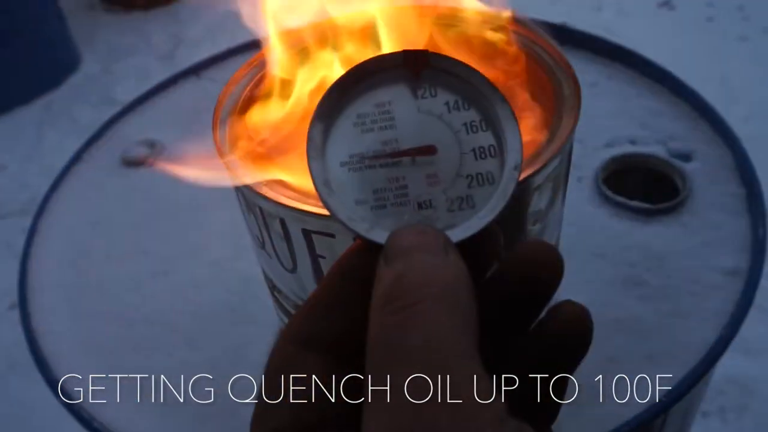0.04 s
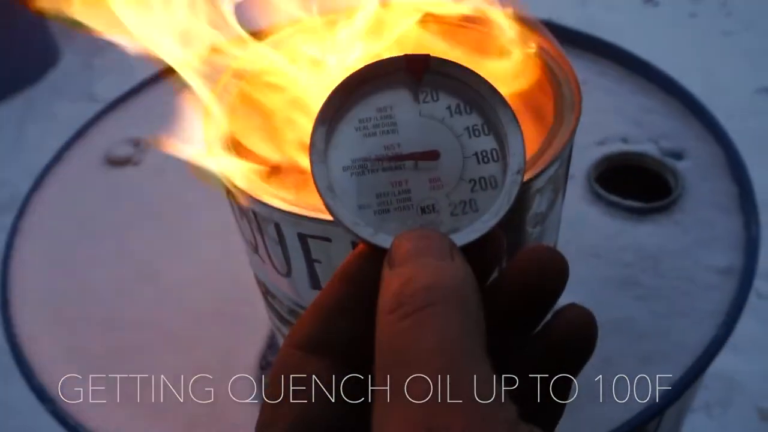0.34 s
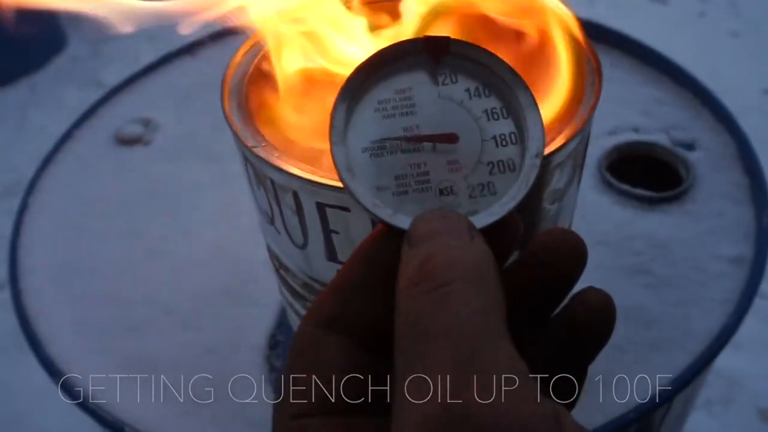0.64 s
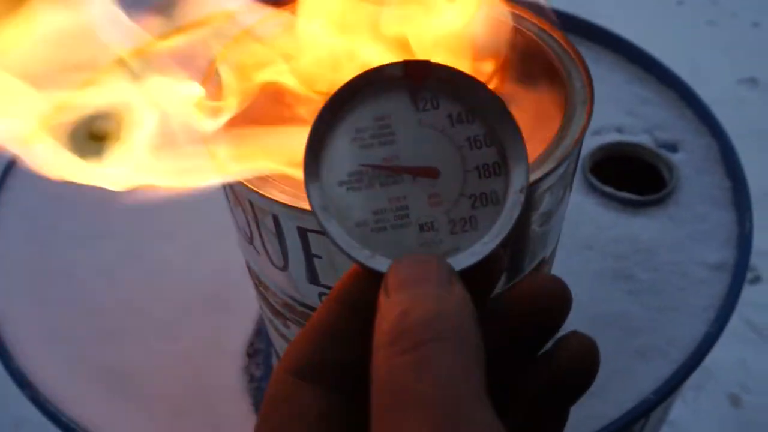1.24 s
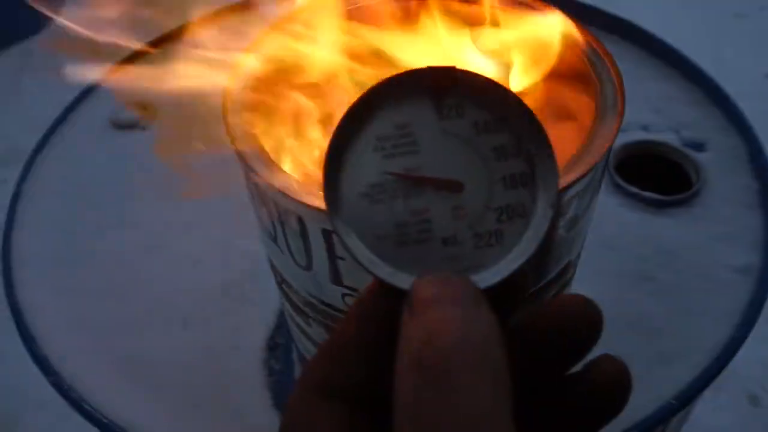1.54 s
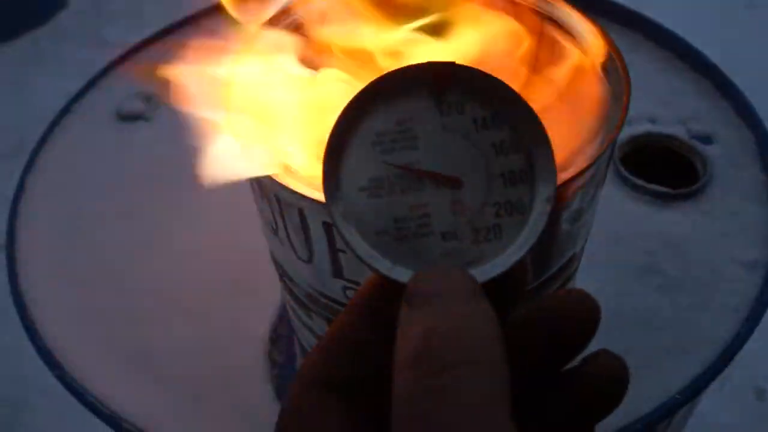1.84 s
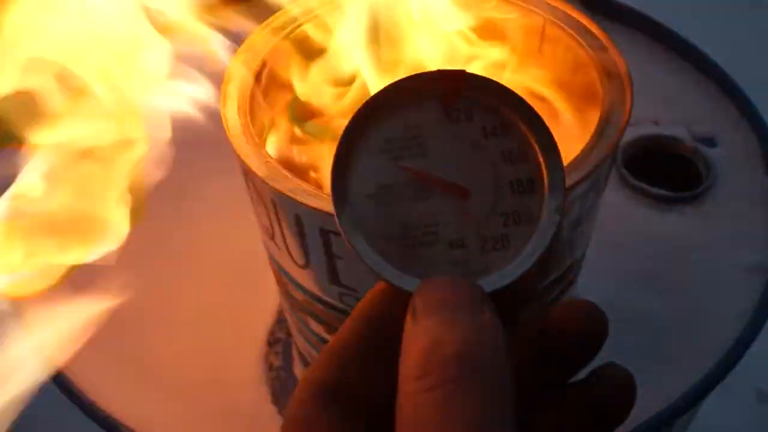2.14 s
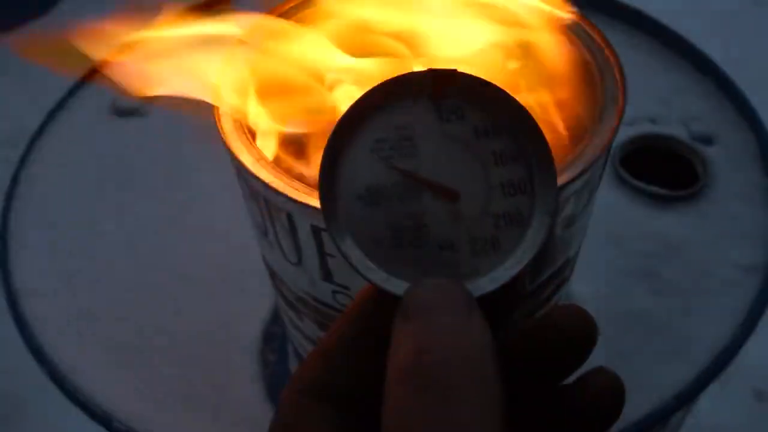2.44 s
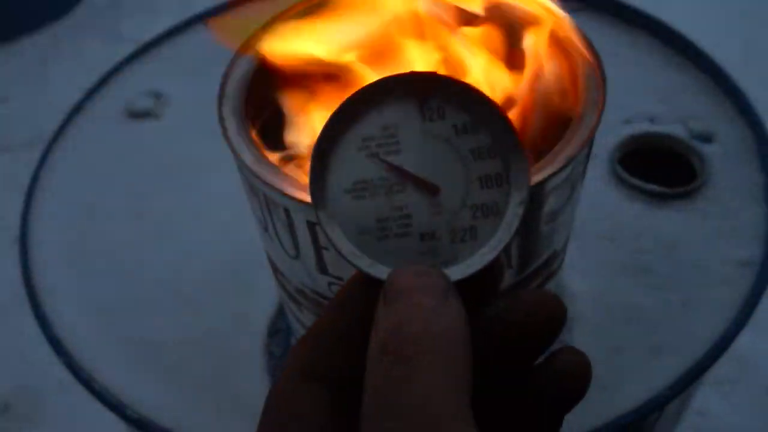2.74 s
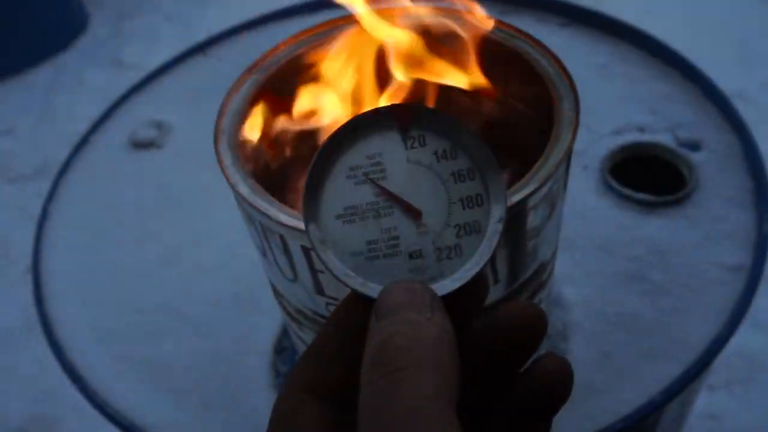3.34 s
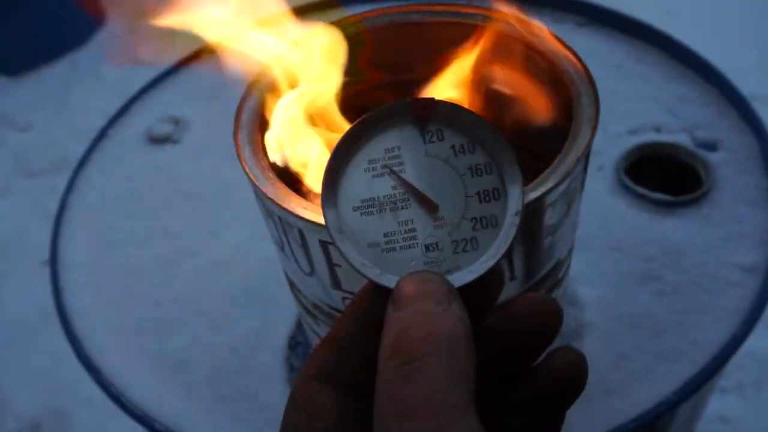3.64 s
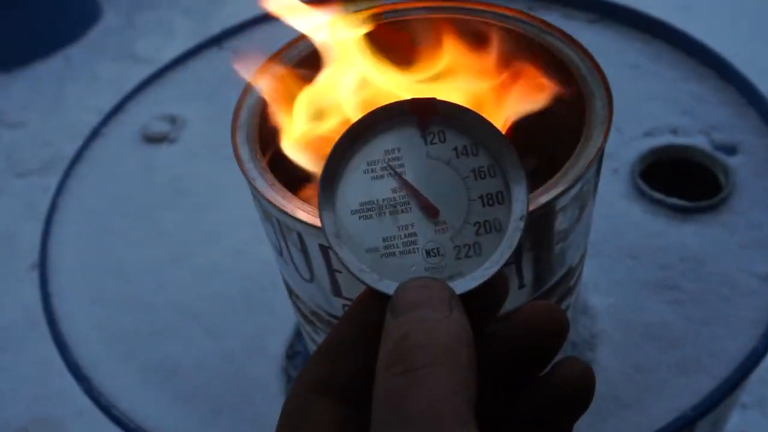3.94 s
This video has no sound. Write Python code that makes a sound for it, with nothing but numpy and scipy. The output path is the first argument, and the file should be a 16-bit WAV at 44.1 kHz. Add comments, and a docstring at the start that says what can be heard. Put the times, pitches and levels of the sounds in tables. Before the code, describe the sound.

Oil burns in an open metal can outdoors, with a steady low roar, irregular sharp pops and a fine sizzle. The flame flutters throughout, and light wind buffets the close microphone, mostly toward the end.

```python
"""Sharp pops and a fine sizzle come from oil burning in an open metal can on a steel drum outdoors.
Each droplet that bursts in the hot oil is an impulse: it rings for a few cycles, cracks and fizzes,
and the sound rattles briefly round the can. Flying oil ticks, trapped moisture spits, and the
smallest bursts merge into hiss. Underneath lie a steady low roar with hollow resonances,
a fluttering flame and light wind buffeting the microphone."""
import sys
import numpy as np
from scipy import signal
from scipy.fft import rfft, irfft
from scipy.io import wavfile
from scipy.ndimage import uniform_filter1d

SR = 44100
rng = np.random.default_rng(int(sys.argv[2]) if len(sys.argv) > 2 else 0)


def dump(signal):
    """Clip the signal to [-1, 1] and save it as 16-bit WAV at the path in sys.argv[1]."""
    limited = np.clip(np.atleast_2d(signal).T, -1, 1)
    pcm = np.round(limited * 32767).astype(np.int16)
    wavfile.write(sys.argv[1], SR, pcm)


N = 176400

# strength of the frying, followed by spatter, hiss and faint ticks (time [s], relative level [dB])
FRYING = [(0, -44.5), (.2, -46), (.5, -44.5), (.9, -53), (1.1, -50.5), (1.5, -48.5), (1.75, -49.5),
          (1.87, -50.5), (2.05, -46.5), (2.38, -50), (2.7, -46.5), (2.9, -53.5), (3.15, -52.5),
          (3.25, -48.5), (3.33, -57.5), (3.55, -58), (3.68, -52), (3.78, -66), (4, -50.5)]
FRYING_PAN_DB = -3


def pops(size=2200):
    """Impulse response: a bursting droplet rings and cracks near one pitch, then fizzes as it boils away."""
    # bursts (time [s], ring level [dB], pitch [Hz], ring decay [ms], crack level [dB], fizz level [dB])
    droplets = [(0.024, -30, 2900, 1.6, -39, -51), (.0447, -35, 3080, 1, -47, -52),
                (0.063, -34, 3160, 0.82, -30.5, -42), (0.0737, -32, 2840, 1.3, -37.5, -45),
                (.135, -27.5, 3350, 0.45, -34, -53), (.184, -29.5, 4000, .9, -39, -41),
                (0.1987, -37, 3030, 1, -39, -41.5), (0.3468, -24.5, 2460, 0.88, -42, -38),
                (.3519, -42, 1450, 0.67, -33, -49), (0.4161, -25.5, 5040, 0.44, -38, -63),
                (.462, -28.5, 3630, 0.91, -42, -41), (0.4974, -33, 2520, 1.4, -39, -43),
                (.534, -23, 2470, 1.7, -29, -44), (0.5454, -30.5, 6300, 0.48, -42, -62),
                (.5776, -29.5, 1340, 1.3, -29, -51), (.611, -34.5, 8900, .7, -52, -49),
                (0.626, -33.5, 3520, 1, -48, -65), (0.6535, -38, 1440, 1.5, -35, -42.5),
                (0.6773, -32, 8830, 0.39, -50, -68), (0.7415, -34, 5100, .8, -45, -70),
                (0.78, -29.5, 4220, 1.4, -36.5, -64), (.8084, -38, 7160, 0.63, -46, -50),
                (.8676, -28, 3950, 0.71, -33, -40.5), (.9125, -39, 2510, 1.2, -30, -42),
                (0.9738, -25.5, 2510, 0.76, -26.5, -52), (0.9752, -37, 1710, 0.51, -35, -47),
                (1.0742, -35.5, 4570, 0.61, -43, -56), (1.103, -26.5, 1460, 0.73, -32, -49),
                (1.1887, -43, 2400, 1, -30.5, -47.5), (1.267, -37, 2530, 1.1, -42.5, -45.5),
                (1.3112, -36.5, 9600, .6, -43, -47.5), (1.3232, -28.5, 5250, 1.2, -46, -47),
                (1.357, -24.5, 1760, 0.14, -34, -53), (1.5482, -28, 2130, 0.5, -29.5, -53),
                (1.5538, -30.5, 1640, 0.32, -30, -60), (1.6003, -32.5, 2970, 0.62, -48, -64),
                (1.6118, -28, 5450, 0.87, -38.5, -43.5), (1.6292, -30.5, 2400, 1.2, -39, -63),
                (1.7333, -27, 2840, 0.37, -39, -48), (1.7754, -28, 2410, 0.87, -47, -44),
                (1.806, -35, 7300, 0.6, -47, -47.5), (1.8351, -46, 5660, .8, -31.5, -47),
                (1.8524, -30.5, 2640, 1.4, -44, -45.5), (1.941, -34, 3780, .8, -40, -45),
                (1.9902, -32, 3580, .5, -35, -62), (2.1068, -25, 2120, 0.5, -35.5, -43.5),
                (2.109, -37, 2000, 1.5, -35, -55), (2.232, -43, 5250, .7, -48, -69),
                (2.378, -45, 5800, 1.4, -35, -60), (2.432, -37, 9400, 0.65, -42, -52),
                (2.463, -33.5, 2920, 1.3, -36.5, -61), (2.4796, -43, 8350, .6, -42, -42.5),
                (2.5018, -35, 4400, 1, -36, -68), (2.519, -39, 5450, .8, -36, -41.5),
                (2.6217, -34.5, 2690, 0.75, -38, -46.5), (2.666, -41, 4150, 1.4, -33.5, -46),
                (2.6794, -36, 4200, 0.83, -41, -66), (2.697, -51, 4600, 0.73, -36, -65),
                (2.769, -55, 5500, .7, -44, -69), (2.8012, -31.5, 1320, 0.88, -30, -42),
                (2.9268, -28.5, 4860, 0.78, -40.5, -50), (2.937, -35, 2620, 0.8, -42, -51),
                (3.0388, -33, 4150, 1.7, -39, -60), (3.0415, -31.5, 9460, 1.2, -38, -64),
                (3.1847, -24.5, 1330, 1.6, -34.5, -40.5), (3.2338, -34.5, 2440, 1.1, -34.5, -48),
                (3.2478, -36, 1510, 2, -39, -41.5), (3.3532, -39.5, 4140, 1.3, -44, -50),
                (3.5278, -25.5, 4320, 0.22, -41, -70), (3.6531, -47, 1700, 1.8, -34, -46),
                (3.684, -36, 6900, 0.62, -54, -57), (3.7878, -45, 2450, 1, -41, -51),
                (3.851, -35.5, 2400, 0.98, -40.5, -49), (3.9448, -40.5, 1110, 1.6, -46, -65),
                (3.9789, -42, 2280, 0.98, -38, -47), (3.9888, -38, 4000, 1.2, -46, -46)]
    # spectrum of the crack (frequency [multiple of the pitch], gain [dB])
    crack_spectrum = [(.2, -22), (.45, -11), (.7, -2), (1.05, 2), (1.35, -6), (1.85, -4), (3, -14),
                      (5, -26), (10, -39)]
    # spectrum of the fizz (frequency [Hz], gain [dB])
    fizz_spectrum = [(900, -5), (1450, 10), (1800, 1), (2450, 12), (3000, 8.5), (4200, 6.5), (5500, -1.5),
                     (6300, -5.5), (9300, -11), (12000, -10), (16000, -44)]
    ring_rise_s, crack_rise_s, crack_decay_s = .0002, .0005, .0013
    fizz_rise_s, fizz_decay_s, cut_db_per_octave = .003, .011, 9
    out, t = np.zeros((2, N)), np.arange(size) / SR
    for start, ring_db, hz, decay_ms, crack_db, fizz_db in droplets:
        ring = np.sin(2 * np.pi * hz * t) * np.exp(-1000 * t / decay_ms)
        ring = unit_onset(ring * (1 - np.exp(-t / ring_rise_s)))
        noise = rng.standard_normal((6, size))  # common, left and right: for the crack, then the fizz
        crack = (noise[0] + .6 * noise[1:3]) * np.exp(-t / crack_decay_s)
        crack *= 1 - np.exp(-t / crack_rise_s)
        crack = unit_onset(tint(crack, [(ratio * hz, db) for ratio, db in crack_spectrum]))
        # small droplets fizz higher: the spectrum is cut below the pitch
        fizz_colour = [(f, db - cut_db_per_octave * max(np.log2(hz / f), 0)) for f, db in fizz_spectrum]
        fizz = unit(tint(noise[3] + noise[4:], fizz_colour))
        fizz *= np.exp(1 - t / fizz_decay_s) * (1 - np.exp(-t / fizz_rise_s))
        burst = undb(ring_db) * ring + undb(crack_db) * crack + undb(fizz_db) * fizz
        add(out, start, pan(-4 + 4.3 * rng.standard_normal()) * burst)
    return out


def ticks(size=400):
    """A brief pulse has a broad spectrum: flying oil makes dry clicks, a few loud and many faint."""
    # loud ticks of oil (time [s], relative level [dB])
    loud_ticks = [(.0498, -35), (.3596, -34), (0.6042, -33), (0.868, -36), (1.0094, -28), (1.011, -29.5),
                  (1.0548, -32), (1.486, -33), (1.6118, -37), (1.9914, -36.5), (2.261, -35), (2.2857, -33),
                  (2.466, -27.5), (2.6658, -32), (2.807, -31.5), (2.8193, -29), (2.8572, -35),
                  (3.0634, -33), (3.0715, -28.5), (3.5544, -41), (3.6062, -41), (3.896, -38.5)]
    # spectrum of a tick (frequency [Hz], gain [dB])
    spectrum = [(600, -6), (1500, -7.5), (3000, 3.5), (5500, 2.5), (9500, 1.5), (12000, -2.5), (16000, -9)]
    pulse_s, tail_s, faint_per_s = .000066, .0024, 30
    out, t, frying = np.zeros((2, N)), np.arange(size) / SR, curve(FRYING)
    envelope = np.exp(-t / pulse_s) + undb(-29) * np.exp(-t / tail_s)
    clicks = [(start, undb(db)) for start, db in loud_ticks]
    for when, strength in rng.random((int(faint_per_s * N / SR), 2)):
        db = -1 + 3 * min(-np.log(1 - strength), 2)
        clicks.append((when * N / SR, frying[int(when * N)] * undb(db)))
    for start, gain in clicks:
        pulse = rng.standard_normal((2, size)) * envelope
        add(out, start, gain * unit_onset(tint(pulse, spectrum)))
    return out * pan(-3)


def spatter(size=200):
    """Superposition: tiny bursts, each a damped sine of random pitch, add up to flurries of sizzle."""
    # spectrum of the spatter (frequency [Hz], gain [dB])
    spectrum = [(900, -1.5), (1800, -15), (2500, -7), (3200, -5), (4300, -3.5), (5500, 0), (6300, -4.5),
                (8000, -1.5), (9500, 0), (11500, -6.5), (16000, -4)]
    bursts_per_s, low_hz, high_hz, decay_cycles, max_lag_s = 2200, 2100, 14000, 2.8, .00013
    out, t = np.zeros((2, N)), np.arange(size) / SR
    flurry = undb(2.8 * walk(22.02))
    for when, pitch, strength, side, lag in rng.random((int(bursts_per_s * N / SR), 5)):
        hz = low_hz * (high_hz / low_hz) ** pitch
        age = np.maximum(t - np.array([[lag], [1 - lag]]) * max_lag_s, 0)  # one side hears it first
        grain = np.sin(2 * np.pi * hz * age) * np.exp(-age * hz / decay_cycles)
        db = 4.6 * min(-np.log(1 - strength), 3.5)  # capped exponential spread: few are strong
        add(out, when * N / SR, undb(db) * pan(FRYING_PAN_DB + 6 * (2 * side - 1)) * grain)
    return unit(tint(out, spectrum) * flurry) * curve(FRYING) * undb(-1)


def spits():
    """Band-limited noise: trapped moisture boils off in a sizzle, near a whistle if the band is narrow."""
    # boil-offs (time [s], duration [s], centre frequency [Hz], bandwidth [Hz], level [dB])
    boil_offs = [(0, 0.37, 6100, 3000, -52), (.02, 0.21, 2930, 1000, -54.5),
                 (0.339, 0.23, 2550, 700, -53.5), (0.068, 0.071, 8500, 2200, -52),
                 (0.16, 0.031, 9300, 2000, -49), (0.799, 0.032, 6960, 2000, -44),
                 (0.864, 0.045, 8000, 3000, -43.5), (0.975, 0.27, 4470, 160, -55),
                 (1.134, 0.039, 7200, 2300, -48.5), (1.813, 0.08, 8600, 3000, -48),
                 (1.823, 0.12, 5070, 1200, -50), (2.118, 0.31, 4850, 1720, -59),
                 (2.315, 0.086, 5200, 1410, -47.5), (2.404, .1, 9600, 3000, -58),
                 (2.562, 0.24, 4500, 900, -57), (2.624, 0.25, 5460, 300, -53),
                 (3.103, 0.0097, 6900, 2000, -47.5), (3.225, .043, 6900, 2000, -49.5),
                 (3.932, 0.032, 8240, 3000, -52.5)]
    out = np.zeros((2, N))
    for start, duration, hz, width, db in boil_offs:
        n = int(max(duration, .01) * SR)
        band = signal.butter(2, [hz - width / 2, hz + width / 2], "band", fs=SR, output="sos")
        sizzle = signal.sosfilt(band, rng.standard_normal((2, SR))[:, :n])
        flutter = undb(5 * walk(254.6)[:n])
        add(out, start, undb(db) * unit(sizzle * flutter * signal.windows.tukey(n, .5)))
    return out * pan(-4.5)


def can(crackle, size=6000):
    """Convolution adds reflections off can and drum lid, the can's modes and a faint outdoor tail."""
    # spectrum of the reflections (frequency [Hz], gain [dB])
    echo_spectrum = [(500, -15), (1400, 4), (1800, -3), (2500, 5), (5500, 2), (9300, 4), (12000, -2),
                     (15000, -3)]
    # normal modes of the can (frequency [Hz], time to decay by 60 dB [s], relative level [dB])
    modes = [(1410, .02, -14), (2040, .09, -33), (2200, .09, -31), (2380, .11, -25.5), (2470, .11, -25),
             (2620, .11, -25.5), (2950, .09, -31), (4210, .05, -33), (5500, .03, -27)]
    delay_s, can_decay_s, outdoor_decay_s = .00084, .0014, .012
    t = np.arange(size) / SR
    echo = 0
    for decay_s in (can_decay_s, outdoor_decay_s):
        tail = rng.standard_normal((2, size)) * np.exp(-t / decay_s) * (t > delay_s)
        echo += undb(-11.5) * unit(tail)
    echo = tint(echo, echo_spectrum)
    for hz, t60, db in modes:
        echo += undb(db) * unit(np.cos(2 * np.pi * hz * t) * np.exp(-np.log(1000) * t / t60))
    return crackle + signal.fftconvolve(crackle, echo / np.sqrt(size), axes=1)[:, :N]


def hiss():
    """Bursts too fine for the ear to resolve fuse into continuous frying noise."""
    # spectrum of the hiss (frequency [Hz], relative spectral density [dB])
    spectrum = [(900, 29), (1800, -14), (2500, -5), (3500, 10), (5400, -11), (6500, -7.5), (9500, -25.5),
                (12000, -28), (16000, -39)]
    noise = unit(colour(rng.standard_normal((2, N)), spectrum))
    return noise * curve(FRYING) * undb(-6 + .99 * walk(26.9)) * pan(FRYING_PAN_DB)


def roar():
    """Resonance: narrow bands of noise stand out as hollow tones in the steady rumble of combustion."""
    # spectrum of the rumble (frequency [Hz], relative spectral density [dB])
    spectrum = [(25, -24), (50, -11.5), (80, -16.5), (110, -3.5), (140, -6), (200, 1.5), (300, 3),
                (400, -0.5), (500, -3.5), (630, -6), (800, -19.5), (1000, -24.5), (1400, -25.5),
                (2000, -35.5), (4000, -46.5), (9000, -58), (16000, -55)]
    # left-right difference, small in the bass (frequency [Hz], gain [dB])
    side_spectrum = [(50, -35), (120, -65), (250, -20), (500, -14.5), (1000, -3.5), (2500, 5.5), (8000, 6)]
    # hollow resonances (frequency [Hz], width [Hz], level [dB])
    resonances = [(108.2, 16, -49), (153.1, 7.9, -45), (221.2, 3, -49), (420.4, 37, -44), (463, 19, -53.5),
                  (550, 19, -48), (718, 7.6, -53.5), (801, 9.8, -55)]
    mid, side, drive = rng.standard_normal((3, N))
    mid = unit(colour(mid, spectrum))
    side = colour(unit(colour(side, spectrum)), side_spectrum)
    out = undb(-32) * np.array([mid + side, mid - side])
    f, excitation = np.fft.rfftfreq(N, 1 / SR), rfft(drive)
    for hz, width, db in resonances:
        response = 1 / (1 + (1.62 * (f - hz) / width) ** 2)
        out += undb(db) * unit(irfft(excitation * response, N))
    return out


def flame():
    """Amplitude-modulated noise: the flame flutters, and swells as if drawn out of the can by wind."""
    # swells of the flame (time [s], level [dB])
    swells = [(0, -47.5), (.5, -45.5), (.78, -34.5), (1.1, -44.5), (1.4, -41.5), (1.85, -40.5), (2.3, -37),
              (2.75, -42.5), (3.2, -41.5), (3.6, -43), (4, -40.5)]
    # spectrum of the flame (frequency [Hz], relative spectral density [dB])
    spectrum = [(40, -1), (100, 9), (200, 2.5), (450, -4), (800, -3), (1100, -8), (1700, -21),
                (4000, -42.5)]
    noise = unit(colour(rng.standard_normal(N), spectrum))
    flutter = undb(2.2 * walk(15))
    return noise * curve(swells) * flutter


def wind():
    """Low pressure fluctuations, uncorrelated at the two microphone ports, stronger on the right."""
    # strength of the wind (time [s], level [dB])
    strength = [(0, -54), (.3, -38), (.55, -50), (.8, -44), (1.18, -56), (1.6, -62), (1.85, -54),
                (2.15, -51), (2.68, -54), (2.85, -38), (3.0, -44), (3.11, -32), (3.22, -38), (3.42, -35),
                (3.55, -45), (3.68, -35), (3.77, -43), (3.9, -33.5), (4, -42)]
    # spectrum of the buffeting (frequency [Hz], relative spectral density [dB])
    spectrum = [(15, 9), (30, -5.5), (60, 11), (95, 6.5), (140, 3), (250, -11.5), (600, -46.5)]
    buffeting = unit(colour(rng.standard_normal((2, N)), spectrum))
    gusts = undb(2.5 * walk(7.4))
    return buffeting * curve(strength) * gusts * pan(-9)


def undb(db):
    """Decibels to amplitude ratio."""
    return 10 ** (np.asarray(db) / 20)


def unit(x):
    """Normalise to rms 1."""
    return x / np.sqrt(np.mean(x ** 2) + 1e-20)


def unit_onset(x):
    """Normalise to rms 1 over the first millisecond."""
    return x / np.sqrt(np.mean(x[..., :SR // 1000] ** 2))


def pan(db):
    """Constant-power gains for a level difference, left minus right."""
    return unit(undb(np.array([[db], [-db]]) / 2))


def curve(rows):
    """Amplitude envelope from (time [s], level [dB]) rows."""
    return undb(np.interp(np.arange(N) / SR, *np.array(rows).T))


def gains(rows, hz):
    """Magnitude response from (frequency [Hz], gain [dB]) rows."""
    f, db = np.array(rows).T
    return undb(np.interp(np.log(hz + 1), np.log(f), db))


def colour(x, rows):
    """Zero-phase filtering shapes the spectrum of a steady sound."""
    return irfft(rfft(x) * gains(rows, np.fft.rfftfreq(N, 1 / SR)), N)


def tint(x, rows, size=512):
    """Minimum-phase filtering shapes a short sound and keeps its attack sharp."""
    cepstrum = irfft(np.log(gains(rows, np.fft.rfftfreq(size, 1 / SR))))
    cepstrum[1:size // 2] *= 2
    cepstrum[size // 2 + 1:] = 0
    return signal.lfilter(irfft(np.exp(rfft(cepstrum))), 1, x)


def walk(rate_hz):
    """Random modulation of rms 1, gliding to a new value every 1 / rate_hz seconds."""
    hold = max(int(SR / rate_hz), 1)
    steps = np.repeat(rng.standard_normal(N // hold + 1), hold)
    return unit(uniform_filter1d(steps, hold)[:N])


def add(out, start_s, sound):
    """Superpose a sound on the mix at a given time."""
    i = int(np.clip(start_s * SR, 0, N - 1))
    out[:, i:i + sound.shape[-1]] += sound[..., :N - i]


def scene():
    """Sound pressures add: the background, and the crackle sounding through the can."""
    background = roar() + flame() + wind() + hiss()
    crackle = pops() + ticks() + spatter() + spits()
    return background + can(crackle)


def record(dry):
    """A steep elliptic low-pass filter removes the highest treble."""
    cutoff_hz = 16200
    return signal.sosfilt(signal.ellip(10, .2, 80, cutoff_hz, fs=SR, output="sos"), dry)


dry = scene()
out = record(dry)
dump(out)
```